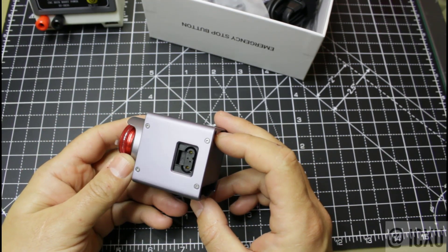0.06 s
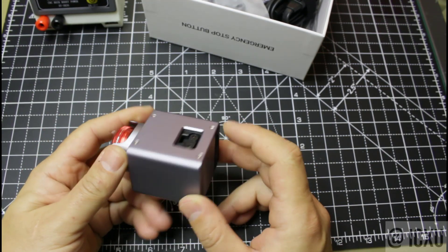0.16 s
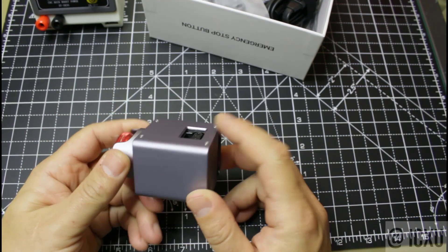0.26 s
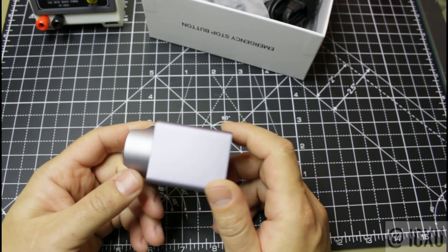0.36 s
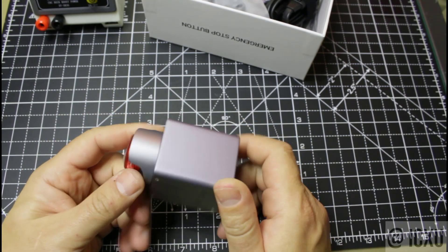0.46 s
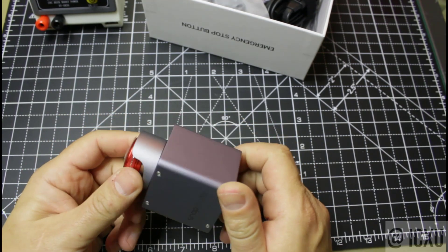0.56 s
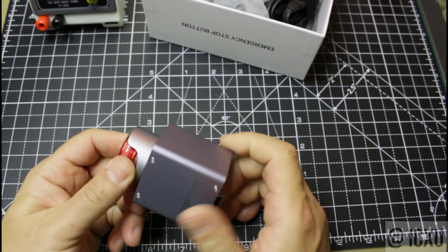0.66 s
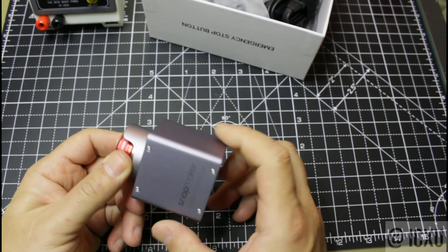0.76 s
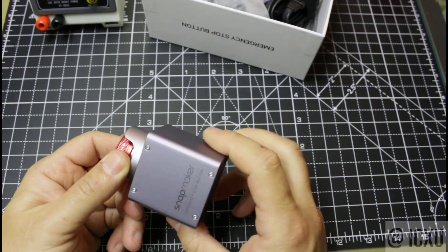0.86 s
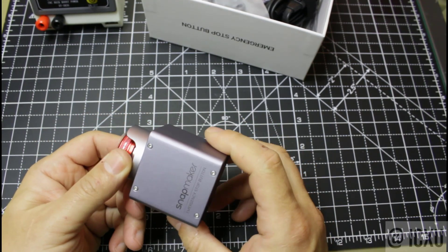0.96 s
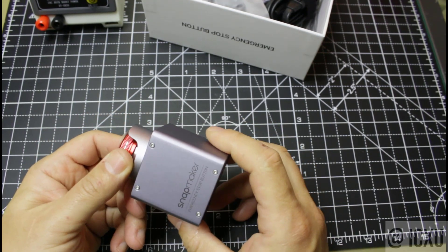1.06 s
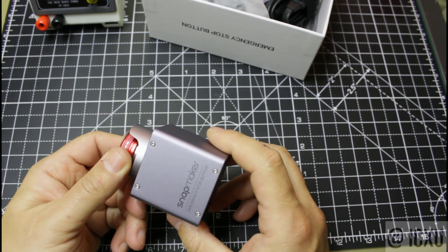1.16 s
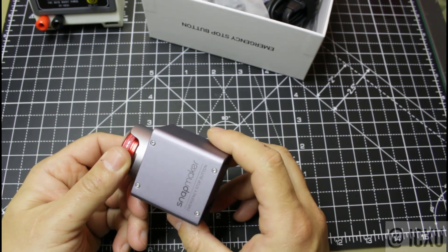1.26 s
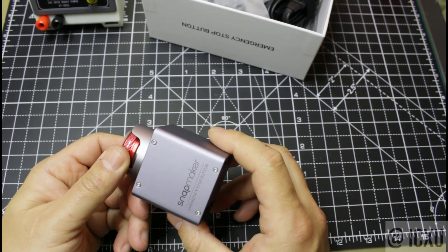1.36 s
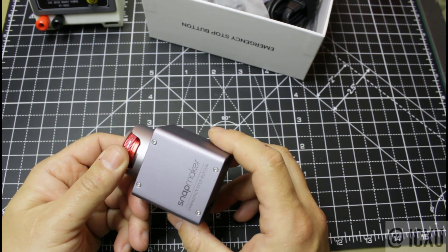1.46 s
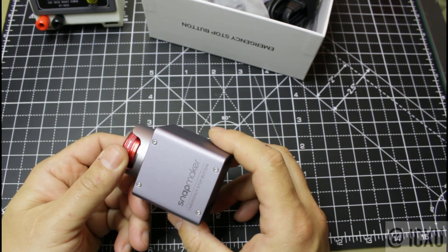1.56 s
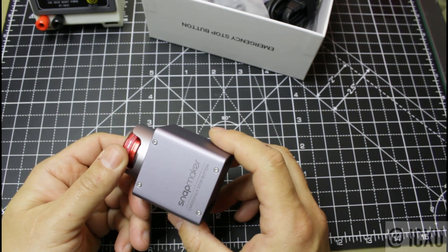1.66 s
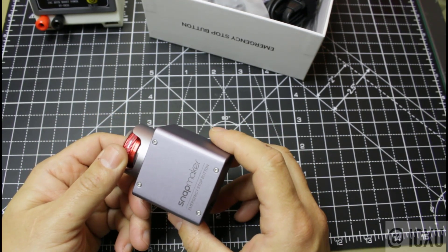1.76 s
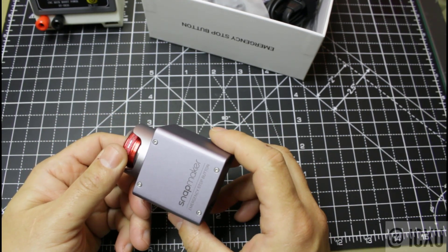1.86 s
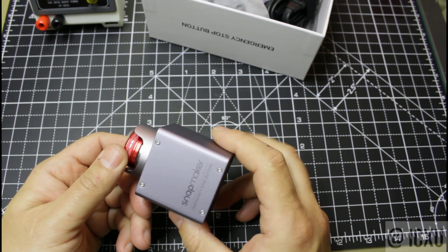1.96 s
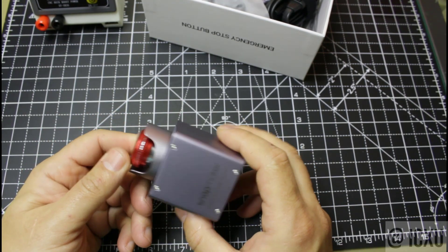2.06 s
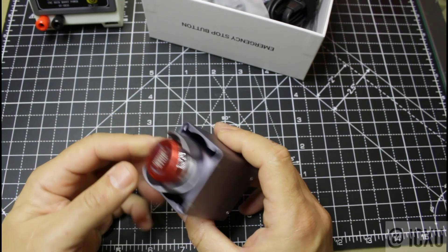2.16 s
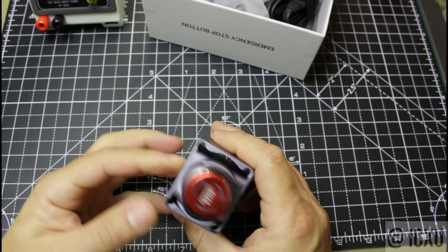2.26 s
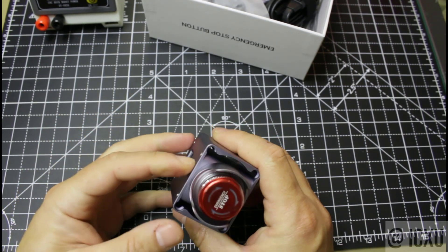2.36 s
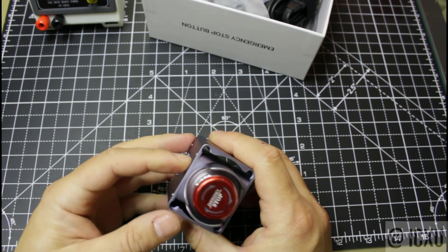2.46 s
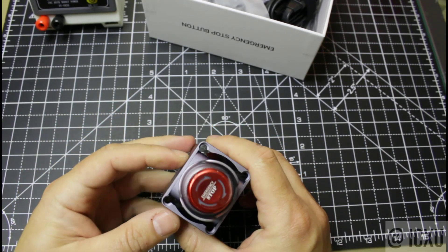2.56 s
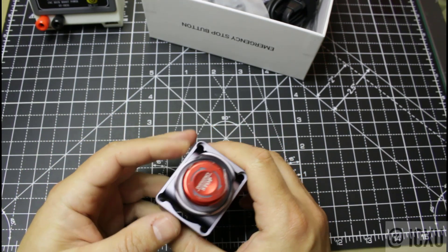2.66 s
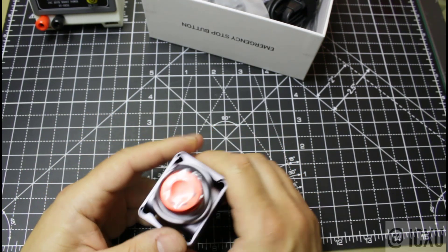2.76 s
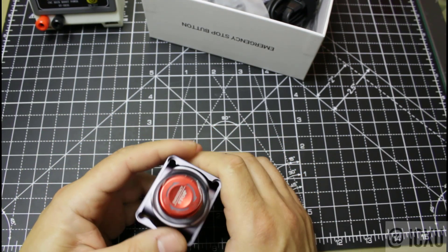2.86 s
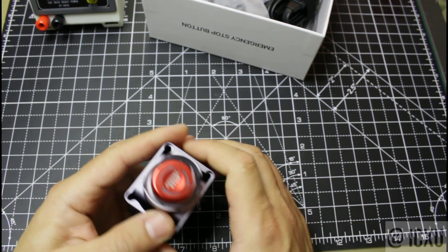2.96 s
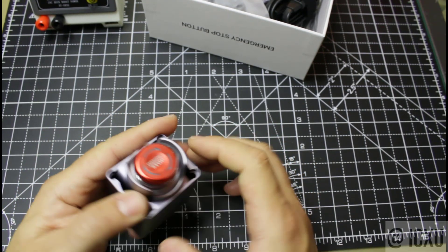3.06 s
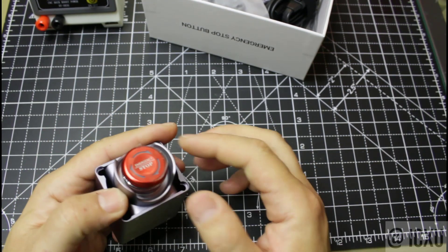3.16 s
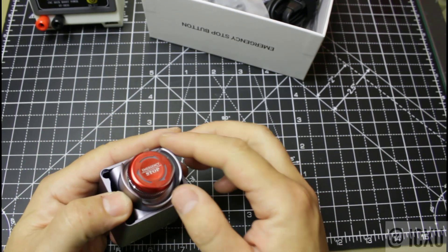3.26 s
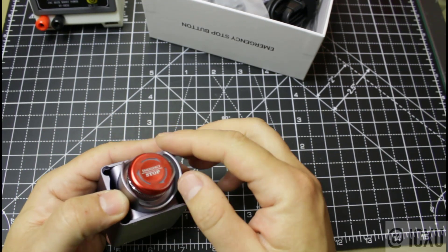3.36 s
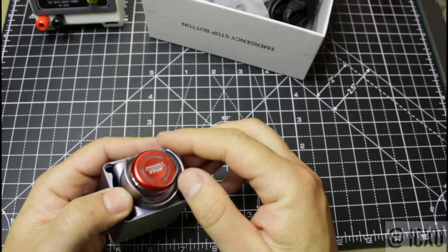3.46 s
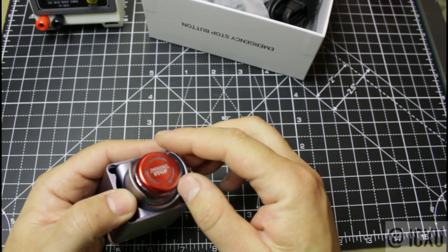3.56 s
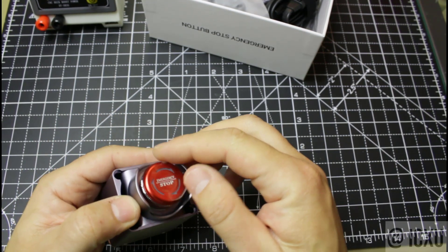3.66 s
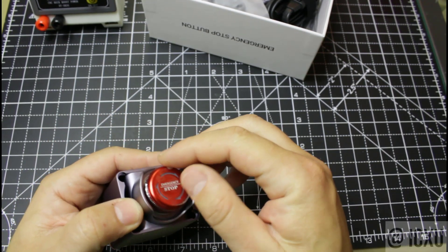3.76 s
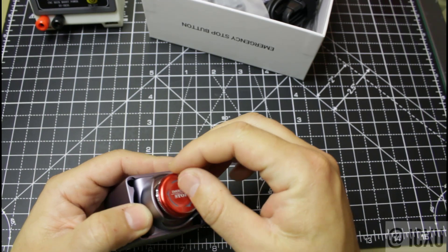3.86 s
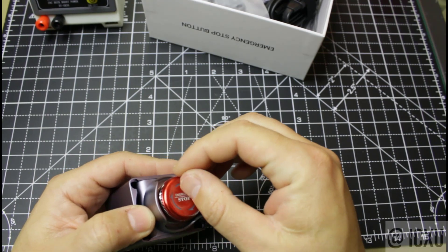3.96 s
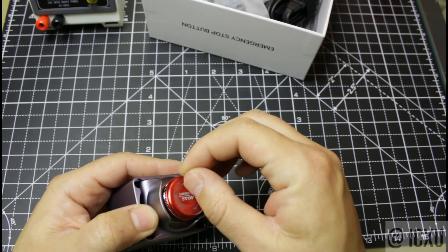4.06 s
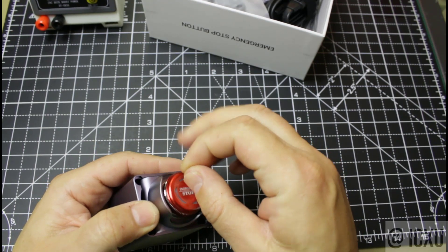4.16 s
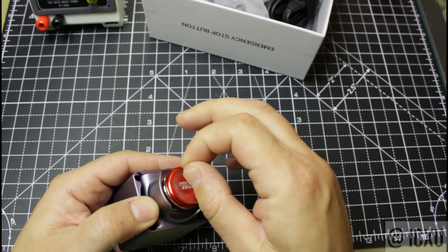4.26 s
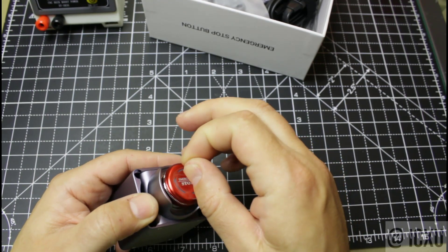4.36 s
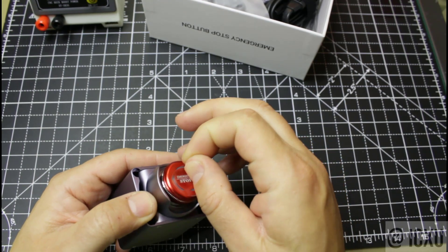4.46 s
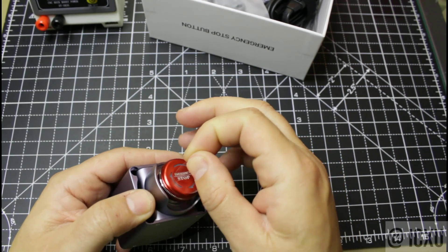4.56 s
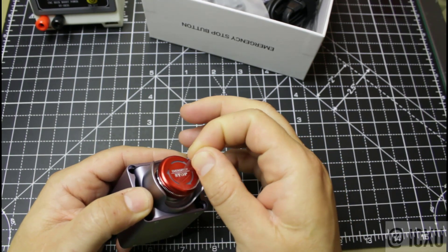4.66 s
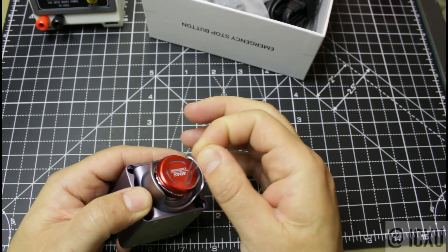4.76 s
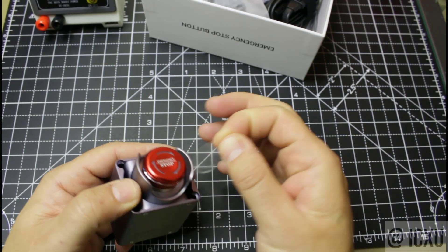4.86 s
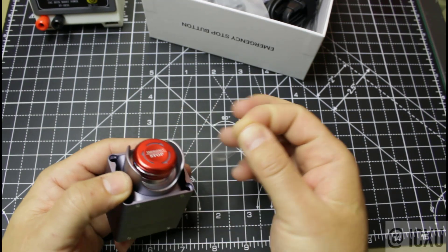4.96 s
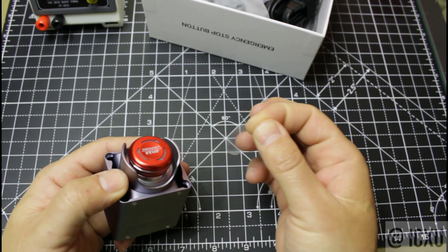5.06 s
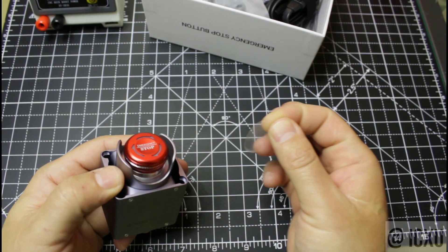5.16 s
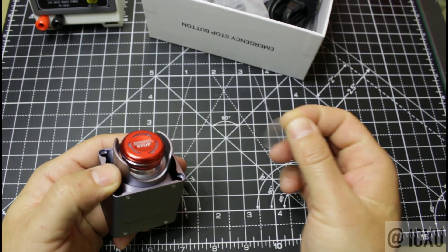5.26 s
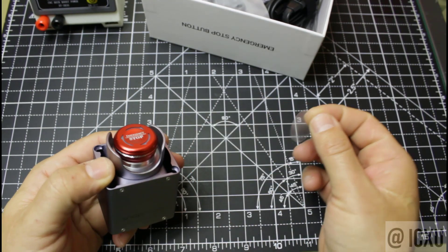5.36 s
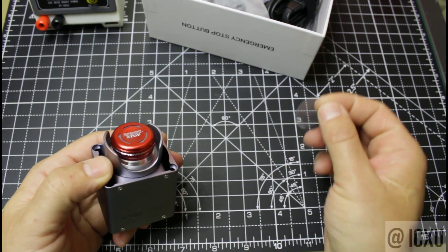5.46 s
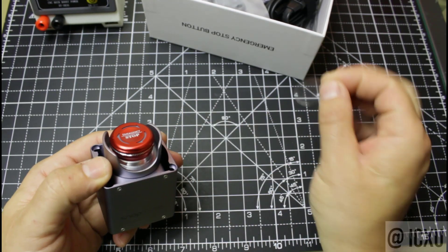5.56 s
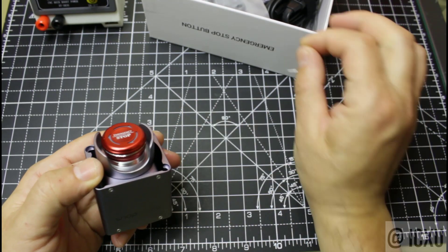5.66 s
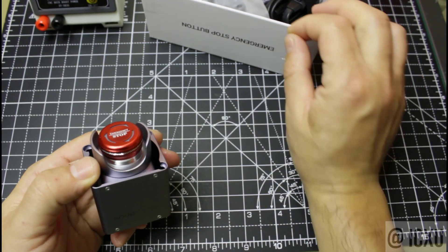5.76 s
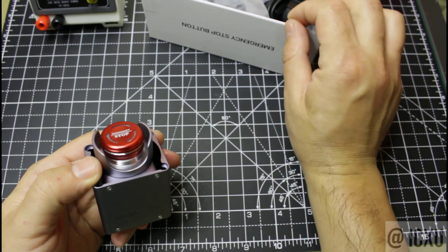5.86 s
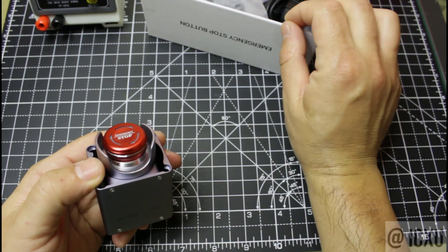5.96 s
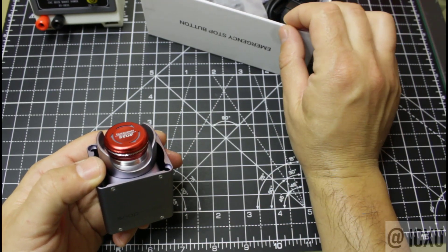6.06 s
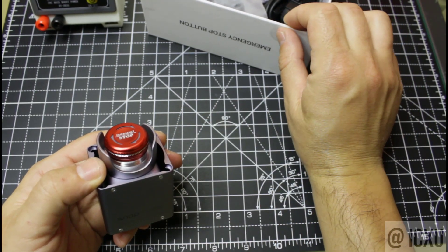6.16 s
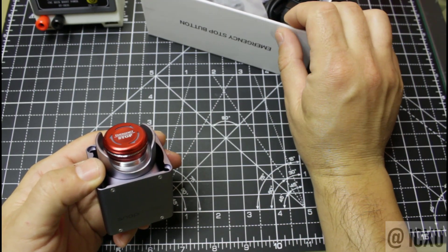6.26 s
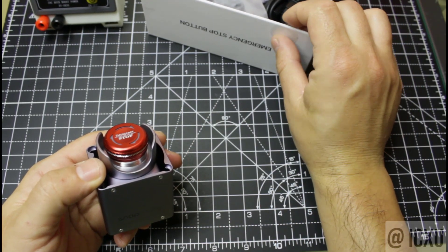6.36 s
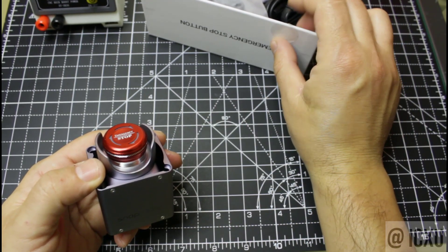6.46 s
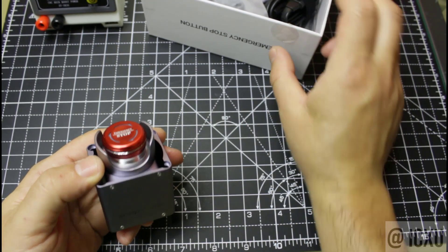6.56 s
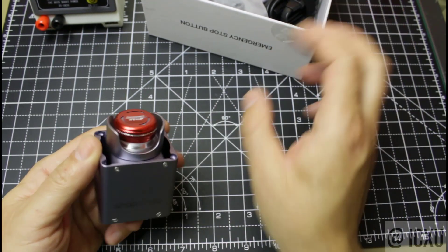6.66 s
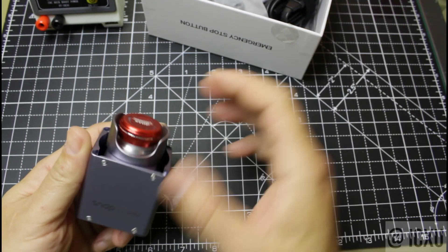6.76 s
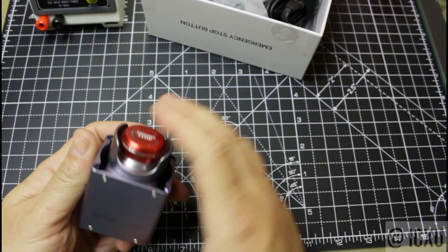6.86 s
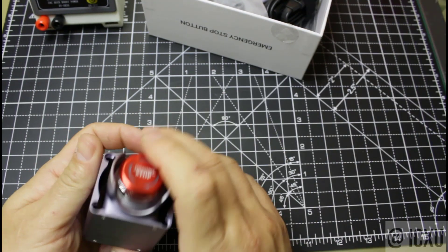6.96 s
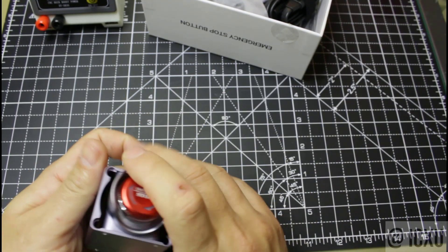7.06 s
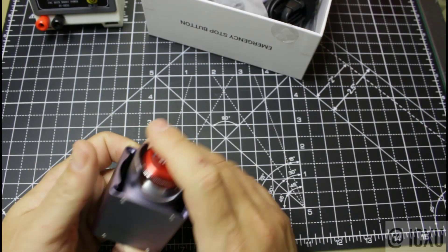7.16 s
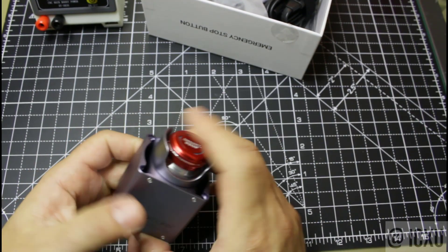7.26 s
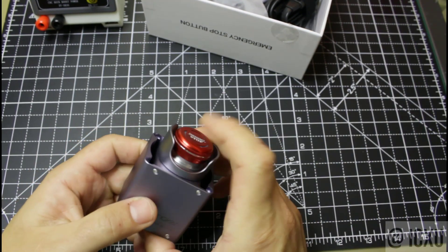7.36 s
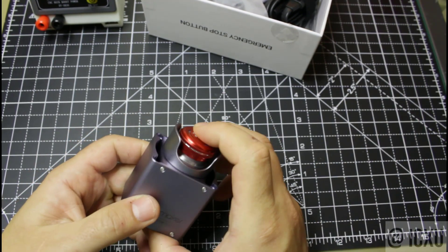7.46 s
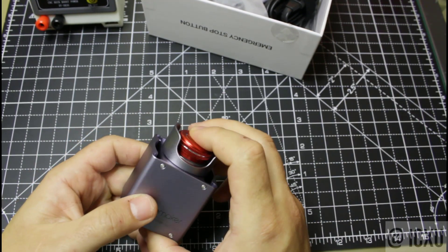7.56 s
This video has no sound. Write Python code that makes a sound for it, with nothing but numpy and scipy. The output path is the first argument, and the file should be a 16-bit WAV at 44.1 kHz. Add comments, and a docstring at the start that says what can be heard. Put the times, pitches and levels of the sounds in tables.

```python
"""Fingers slide on an aluminium emergency-stop housing, pick at its plastic cover until it snaps off
and drop it into a cardboard box; then the mushroom cap is pressed and latches, in a small quiet room.
Contacts are coloured noise bursts, knocks are decaying sines, rubs are filtered streams of tiny slips.
A diffuse reverberation and a steady hush lie behind; a limiter ducks on the loudest snaps."""
import sys
import numpy as np
from scipy import signal
from scipy.fft import rfft, irfft
from scipy.io import wavfile
from scipy.ndimage import uniform_filter1d

SR = 44100
rng = np.random.default_rng(int(sys.argv[2]) if len(sys.argv) > 2 else 0)


def unload_audio(sound):
    """Save the sound as a 16-bit wav file, at the path given as the first command line argument."""
    columns = np.transpose(np.atleast_2d(sound))
    # keep every value between -1 and 1, then stretch to whole-number steps
    steps = np.round(np.clip(columns, -1, 1) * 32767)
    wavfile.write(sys.argv[1], SR, steps.astype(np.int16))


N = 335160
TIME = np.arange(N) / SR

# colour of each kind of hard contact: (frequency [Hz], level [dB])
SCRATCH = [(200, -24), (800, -21), (1350, -12), (1900, -21), (2500, -2), (3500, -13), (4000, -4.5),
           (5600, -6), (7000, 1), (9200, -5), (11000, -11.5), (12800, -31), (13400, -24), (16000, -36)]
NAIL = [(200, -32), (1800, -14.5), (2500, -7.5), (4400, -3), (5700, -5.5), (7500, 2), (8200, -2.5),
        (9000, 2.5), (9900, -7), (11000, -3.5), (13200, -16), (14600, -21), (16000, -30)]
RATTLE = [(300, -32), (2200, -20), (2750, 0), (3150, 8), (3600, -14), (4200, 5), (5000, -19), (8000, -27),
          (11000, -22), (16000, -42)]
EDGE = [(200, -35.5), (900, -20.5), (2300, -14), (4100, -22), (4700, -3), (5300, -9.5), (7000, -4.5),
        (8050, 2), (8700, -5), (9700, -18), (10400, -8), (11600, -15), (13300, -27.5), (16000, -45.5)]
FLEX = [(300, -41.5), (3700, -34.5), (4450, -17), (5100, -30.5), (7200, -19.5), (8250, -3), (9000, -16),
        (9400, -15.5), (10200, -17), (13000, -29.5), (16000, -37.5)]
SNAP = [(150, -46.5), (700, -14), (1900, -9.5), (2900, -14), (4800, -9), (5400, -8), (6800, -3.5),
        (8700, 1.5), (9600, 2.5), (10500, 1), (11600, -7.5), (14000, -13.5), (16000, -21)]
GRAZE = [(300, -7), (900, -13), (1700, -24), (2700, -1.5), (3800, -1.5), (4400, 2), (5300, -7), (6800, -4),
         (7600, 0), (8400, -7), (10000, -10), (12000, -22), (16000, -42)]
DROP = [(150, -28), (600, -26), (900, -15), (1480, -11), (2270, -16), (3350, 1), (4400, -14), (5200, -3),
        (7600, -12.5), (8400, -0.5), (10500, -26), (11700, -8.5), (13000, -29), (16000, -49)]
LATCH = [(150, -29), (1000, -43), (2500, -27), (3700, -23.5), (4500, -14), (5100, -18), (5900, -7),
         (6420, -1.5), (6950, -11), (7500, -9.5), (8400, -17.5), (9800, -14.5), (12500, -25), (16000, -43)]


def from_db(db):
    """Decibels to gain."""
    return 10 ** (np.asarray(db) / 20)


def rms_one(x):
    """Scale to rms 1."""
    return x / np.sqrt(np.mean(x ** 2) + 1e-20)


def unit_energy(x):
    """Scale to energy 1."""
    return x / np.sqrt(np.sum(x ** 2) + 1e-20)


def at_hz(points, hz):
    """Read a table on a log-frequency axis."""
    f, value = np.transpose(points)
    return np.interp(np.log(np.maximum(hz, 1)), np.log(f), value)


def add(out, s, sound):
    """Mix a sound in at a time."""
    at = int(round(s * SR))
    out[at:at + len(sound)] += sound[:N - at]


def colour(x, spectrum, size=4096):
    """Causal (minimum-phase) filter of unit energy with the given spectrum."""
    log_gain = np.log(from_db(at_hz(spectrum, np.fft.rfftfreq(size, 1 / SR))))
    cepstrum = irfft(log_gain)
    # folding the cepstrum onto positive times makes the phase minimal
    cepstrum[1:size // 2] *= 2
    cepstrum[size // 2 + 1:] = 0
    impulse = unit_energy(irfft(np.exp(rfft(cepstrum))))
    return signal.fftconvolve(x, impulse)[:len(x)]


def repeats(s, db, gap_s, loss_db, count):
    """A slightly uneven run of contacts, each weaker than the last: rows (time [s], level [dB])."""
    gap_spread = .2  # share of the gap
    gaps_s = gap_s * (1 + gap_spread * rng.uniform(-1, 1, count))
    starts_s = s + np.cumsum(gaps_s) - gaps_s
    return zip(starts_s, db - loss_db * np.arange(count))


def chatter(decay_ms, size=4096, count=6):
    """A dying burst of micro-impacts with its energy spread evenly over frequency."""
    fade = np.exp(-TIME[:size] * 1e3 / decay_ms)
    burst = rng.standard_normal(size) * fade
    for _ in range(count):
        flat = irfft(np.exp(1j * np.angle(rfft(burst))))
        burst = flat * np.minimum(1, 10 * fade)
    return unit_energy(burst)


def clicks(desk_ms=3.3, desk_db=-18.0, contact_db=9.0):
    """Each contact chatters, leaves the part's dense modes ringing, and bounces off the desk top."""
    # hard contacts: (time [s], relative strength [dB], what sounds)
    contacts = [(3.6103, -26.5, "edge"), (3.6513, -22, "scratch"), (3.8475, -27.5, "flex"),
                (3.8828, -28, "nail"), (3.8957, -6, "nail"), (3.9206, -7.5, "nail"),
                (3.9270, -23.5, "rattle"), (4.6554, -9, "edge"), (4.8072, -8, "flex"),
                (4.8580, 10.5, "snap"), (4.8597, 12, "snap"), (4.8719, 0, "snap"), (5.846, -26.5, "graze"),
                (5.8570, -22, "graze"), (6.4590, -15.5, "snap"), (6.463, -4.5, "drop"),
                (6.497, -26, "graze"), (7.2260, -30.5, "edge"), (7.288, -35, "edge"),
                (7.406, -22.5, "edge"), (7.5361, 2, "latch"), (7.5378, 10, "latch"), (7.5396, 7, "latch")]
    # what sounds: (colour, chatter time constant [ms], ring time constant [ms], ring level [dB])
    parts = {"scratch": (SCRATCH, 0.27, 6.5, -1.1), "nail": (NAIL, .33, 4.2, -4),
             "rattle": (RATTLE, 10.0, 15.4, 0), "edge": (EDGE, 1.3, 8, -1), "flex": (FLEX, .7, 4.6, -4),
             "snap": (SNAP, .8, 5.3, -0.29), "graze": (GRAZE, 3.9, 13.6, -0.33),
             "drop": (DROP, 2.1, 7.4, -2.5), "latch": (LATCH, 0.73, 5.3, -1.4)}
    # a fingernail skids over the cover's edge in a quick run of slips
    slips = repeats(3.6549, -9.5, gap_s=.0025, loss_db=0.3, count=5)
    skid = [(s, db, "scratch") for s, db in slips]
    out = np.zeros(N)
    for s, db, part in skid + contacts:
        spectrum, chatter_ms, ring_ms, ring_db = parts[part]
        burst = chatter(chatter_ms) + from_db(ring_db) * chatter(ring_ms)
        sound = from_db(db + contact_db) * colour(burst, spectrum)
        add(out, s, sound)
        add(out, s + desk_ms / 1e3, from_db(desk_db) * sound)
    return out


def ring(modes):
    """Decaying sines of a struck body, in alternating polarity."""
    t = TIME[:SR // 2]
    out = np.zeros(len(t))
    for k, (hz, db, t60_s) in enumerate(modes):
        out += (-1) ** k * from_db(db - 60 * t / t60_s) * np.sin(2 * np.pi * hz * t)
    return out


def knocks():
    """Blows that ring a body's strong modes; a longer contact excites fewer high ones."""
    # blows: (time [s], strength [dB], contact time [ms], what is struck)
    blows = [(4.6557, -34, 0.033, "rim"), (5.8384, -27, .2, "box"), (5.9094, -30, 0.82, "box"),
             (6.377, -38.5, 1.2, "box"), (6.4632, -35, .1, "box"), (6.4637, -22, .1, "cover"),
             (6.471, -24.5, .1, "cover"), (7.4057, -42.5, .1, "cover"), (7.5378, -26, 0.056, "spring"),
             (7.5389, -7.5, .1, "switch")]
    # hands bump the desk: (time [s], strength of the first jolt [dB])
    bumps = [(4.091, -37.5), (5.709, -46.5), (6.85, -47.5), (7.275, -46), (7.36, -49.5)]
    # modes of each struck body: (frequency [Hz], level [dB], t60 [s])
    bodies = {"desk": [(73.4, -3, 0.22), (100, -2, 0.15), (128, 1, 0.095), (247, -4, 0.092),
              (313, -6, 0.066)], "box": [(131, -17, 0.071), (186, -5.5, 0.065), (251, -12, 0.066),
              (540, -4.5, 0.014), (693, -6.5, 0.13), (1028, -7, 0.089), (1440, -8, 0.034)],
              "rim": [(770, -6, 0.045), (1220, -16, 0.029), (2280, -8, 0.1), (3000, -4.5, 0.066),
              (7500, -16, .3), (8240, -3.5, 0.22), (11480, -4, 0.1)], "cover": [(880, -37, .07),
              (1046, -7, 0.08), (1290, 0, 0.033), (1482, -2, 0.05), (1580, -5, 0.04), (1843, -1, 0.04)],
              "spring": [(4850, -4, .15), (5970, -8, .25), (6160, -5, .18), (6445, -2, .13),
              (6589, -2, .13)], "switch": [(367, -12, 0.0215), (563, -7, 0.034), (663, -9.5, 0.051),
              (1377, 1, 0.022), (1530, 1, 0.018), (1645, -5, .025), (2670, -28, 0.049)]}
    jolts = []
    for start_s, first_db in bumps:  # each bump is a dying run of soft jolts
        for s, db in repeats(start_s, first_db, gap_s=.018, loss_db=2.2, count=4):
            jolts.append((s, db, 2.8, "desk"))
    out = np.zeros(N)
    for s, db, contact_ms, body in blows + jolts:
        push = np.hanning(int(contact_ms * SR / 1e3) + 3)
        add(out, s, from_db(db) * np.convolve(ring(bodies[body]), push / push.sum()))
    return out


def friction(per_s, spread_db, clump_db=1.5):
    """Random tiny slips of uneven size, in clumps as the skin sticks and lets go; rms 1."""
    pressure = rms_one(uniform_filter1d(rng.standard_normal(N), size=300))
    unevenness = np.clip(rng.standard_normal(N), -2, 2)
    sizes = from_db(spread_db * unevenness + clump_db * pressure)
    signs = rng.choice([-1, 1], N)
    return rms_one(sizes * signs * (rng.random(N) < per_s / SR))


def stroke(peak_s, length_s):
    """A rub swells to its peak and fades again: the samples it covers and its gain on them."""
    rise_share, edge_db = 0.51, 11.5  # share of the length spent swelling, drop at its ends
    roundness = 1.4  # 1 pointed, 2 bell
    span = np.flatnonzero(np.abs(TIME - peak_s) < 2 * length_s)
    t = TIME[span] - peak_s
    from_peak = np.maximum(-t / rise_share, t / (1 - rise_share)) / length_s
    return span, from_db(-edge_db * from_peak ** roundness)


def resonate(x, hz, width_hz):
    """Resonance with gain 1 on top."""
    r = np.exp(-np.pi * width_hz / SR)
    feedforward = np.array([1, 0, -1]) * (1 - r * r) / 2
    feedback = [1, -2 * r * np.cos(2 * np.pi * hz / SR), r * r]
    return signal.lfilter(feedforward, feedback, x)


def fingers(resonant_db=0.5, slide_db=-1.0, ring_ms=5.7, ring_db=-2.5, squeak_width_hz=380.0):
    """Skin slips on the housing: a broad hiss, the metal's resonances, and brief narrow squeaks."""
    # finger strokes: (time of the peak [s], length [s], relative level [dB])
    slides = [(0.19, .08, -49), (0.346, .07, -56.5), (0.432, .1, -46.5), (0.503, .055, -41.5),
              (0.685, .1, -51), (0.828, .03, -40.5), (0.9, .08, -54.5), (2.095, .14, -50.5),
              (2.295, .14, -47), (2.416, .03, -54.5), (2.53, .08, -55), (2.645, .09, -55.5),
              (2.772, .07, -42.5), (2.83, .07, -53.5), (2.972, .07, -46), (3.105, .09, -53),
              (3.47, .2, -57), (3.605, .06, -49.5), (4.53, .22, -55), (5.735, .22, -52), (6.69, .17, -51.5),
              (6.85, .075, -45), (6.922, .075, -43), (7.002, .055, -40), (7.155, .09, -51.5),
              (7.255, .08, -51), (7.43, .06, -54)]
    # hiss of skin on metal: (frequency [Hz], level [dB])
    skin = [(1300, -38), (2400, -23.5), (2950, -5), (4100, -13), (5000, -4.5), (5650, -9), (7600, -4),
            (9000, -12.5), (11000, -17.5), (13700, -22), (15400, -48)]
    # housing resonances: (frequency [Hz], width [Hz], level [dB])
    housing = [(2880, 50, -23), (5080, 200, 1.5), (6080, 730, 0.5), (6700, 130, 2.5), (7380, 270, 4),
               (7740, 150, 5.5), (8220, 190, 1)]
    # a gripping fingertip makes one resonance sing:
    # (time of the middle [s], length [s], frequency [Hz], level [dB])
    squeaks = [(0.144, 0.028, 6420, -52), (0.174, .04, 3150, -54), (0.422, 0.037, 6230, -51),
               (0.501, 0.033, 5220, -45), (0.507, 0.042, 2960, -51), (0.886, .1, 7900, -61),
               (2.049, .06, 1510, -54), (2.073, 0.1, 4750, -58), (2.77, 0.083, 7300, -46),
               (2.77, .08, 12800, -64), (2.962, 0.065, 5280, -53), (3.605, .05, 1400, -54),
               (6.854, 0.075, 7600, -53), (7.007, 0.055, 5190, -46.5), (7.16, .05, 5180, -55.5),
               (7.246, 0.024, 8600, -44), (7.25, 0.032, 10900, -55)]
    slips = friction(per_s=5000, spread_db=4.5)
    metal = rms_one(sum(from_db(db) * resonate(slips, hz, width) for hz, width, db in housing))
    rub = rms_one(colour(slips, skin) + from_db(resonant_db) * metal)
    out, t = np.zeros(N), TIME[:SR // 20]
    for s, length_s, db in slides:
        span, swell = stroke(s, length_s)
        # every new grip damps the case differently, so other fine modes stand out
        fine_modes = unit_energy(rng.standard_normal(len(t)) * np.exp(-t * 1e3 / ring_ms))
        ringing = signal.fftconvolve(rub[span], fine_modes)[:len(span)]
        sliding = rms_one(rub[span] + from_db(ring_db) * ringing)
        out[span] += from_db(db + slide_db) * swell * sliding
    for s, length_s, hz, db in squeaks:
        grip = np.cos(np.pi * np.clip((TIME - s) / length_s, -.5, .5))
        once = resonate(slips, hz, squeak_width_hz)
        tone = rms_one(resonate(once, hz, squeak_width_hz))
        out += from_db(db) * grip * tone
    return out


def cardboard():
    """Hand and cover brush the box: strokes of a duller, finely grained rub."""
    # brushes: (time of the peak [s], length [s], relative level [dB])
    brushes = [(5.853, .1, -43.5), (5.96, 0.084, -50.5), (6.067, .14, -41), (6.406, 0.036, -43.5),
               (6.507, 0.083, -38)]
    # colour of the rub: (frequency [Hz], level [dB])
    card = [(300, -11), (650, -8), (1000, 1.5), (1650, -3), (2300, -8), (3000, -9), (3700, -12.5),
            (6000, -18.5), (9000, -21), (14000, -41)]
    out, rub = np.zeros(N), colour(friction(per_s=3000, spread_db=4.5), card)
    for s, length_s, db in brushes:
        span, swell = stroke(s, length_s)
        out[span] += from_db(db) * swell * rub[span]
    return out


def room(x, build_s=0.0035):
    """Diffuse tail that builds up quickly and dies band by band."""
    # reverberation time: (frequency [Hz], t60 [s])
    room_t60 = [(150, 0.44), (1000, 0.14), (5000, 0.26), (9000, 0.13), (15000, .13)]
    t = TIME[:SR // 2]
    tail = np.zeros(len(t))
    edges_hz = np.geomspace(80, 18000, 10)
    for low, high in zip(edges_hz, edges_hz[1:]):
        band_filter = signal.butter(2, [low, high], "band", fs=SR, output="sos")
        band = signal.sosfilt(band_filter, rng.standard_normal(len(t)))
        t60_s = at_hz(room_t60, np.sqrt(low * high))
        tail += band * from_db(-60 * t / t60_s)
    return signal.fftconvolve(x, unit_energy(tail * (1 - np.exp(-t / build_s))))[:N]


def hush(level_db=-52):
    """Steady background of the room: coloured noise."""
    # colour of the hush: (frequency [Hz], level [dB])
    air = [(12, -36), (20, -2), (96, -3), (241, -7.5), (347, -8.5), (446, -8), (923, -11), (1000, -7.5),
           (1090, -10.5), (1660, -13), (2820, -15), (8180, -23.5), (9950, -27), (14700, -39.5),
           (16000, -58.5)]
    noise = colour(rng.standard_normal(N + SR), air, size=16384)
    return from_db(level_db) * rms_one(noise[SR:])  # the filter settles in the first second


def scene(click_room_db=-17.5, knock_room_db=-13.0):
    """Hands close to the microphone, the room and its steady hush behind them."""
    sharp = clicks() + fingers()
    dull = knocks() + cardboard()
    background = hush()
    tail = room(from_db(click_room_db) * sharp + from_db(knock_room_db) * dull)
    return (sharp + dull + background + tail)[None]


def record(dry, threshold_db=-7.0, release_db_per_s=26.0, ceiling=.88, cutoff_hz=15700):
    """A fast limiter ducks on the loudest snaps and recovers slowly; peaks are rounded, the top is cut."""
    power = uniform_filter1d(dry[0] ** 2, size=160)
    over_db = np.maximum(10 * np.log10(np.abs(power) + 1e-12) - threshold_db, 0)
    # the running maximum of a rising ramp gives a linear release in dB
    release_db = release_db_per_s * TIME
    held_db = np.maximum.accumulate(over_db + release_db) - release_db
    limited = ceiling * np.tanh(dry * from_db(-held_db) / ceiling)
    low_pass = signal.ellip(10, .1, 100, cutoff_hz, fs=SR, output="sos")
    return signal.sosfilt(low_pass, limited)


dry = scene()
out = record(dry)
unload_audio(out)
```